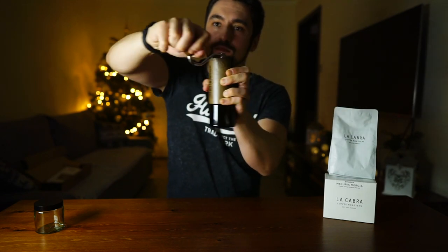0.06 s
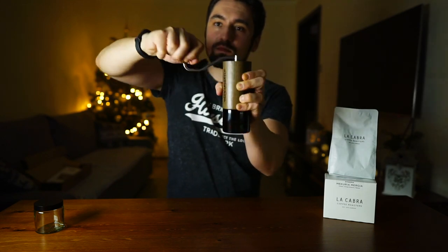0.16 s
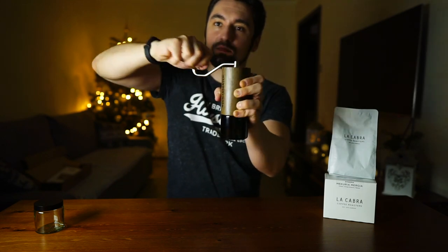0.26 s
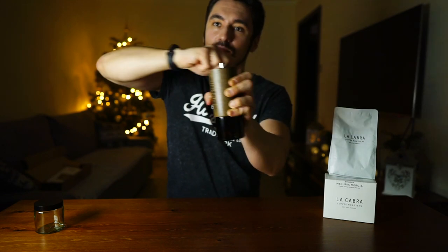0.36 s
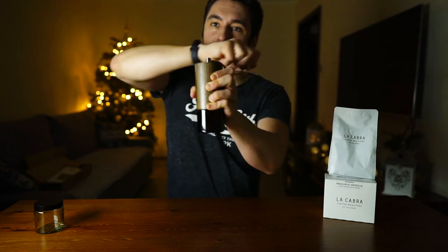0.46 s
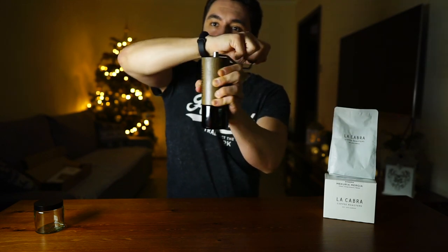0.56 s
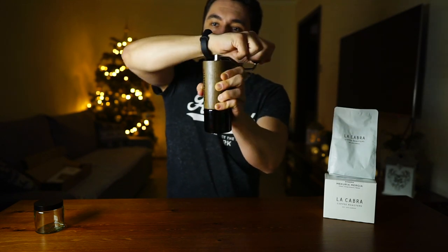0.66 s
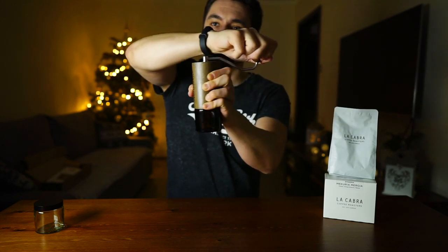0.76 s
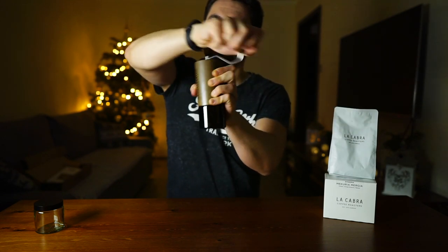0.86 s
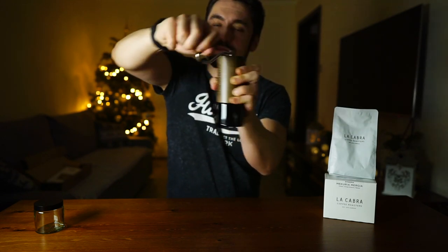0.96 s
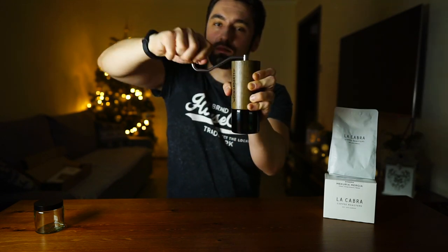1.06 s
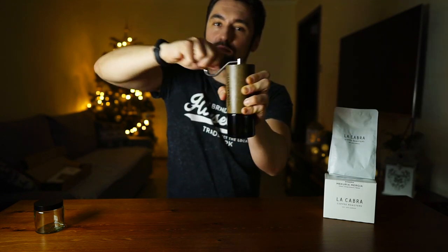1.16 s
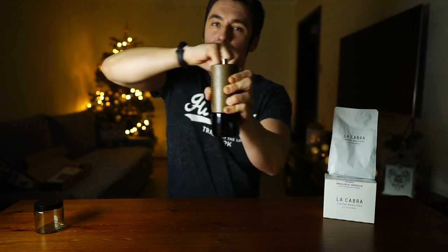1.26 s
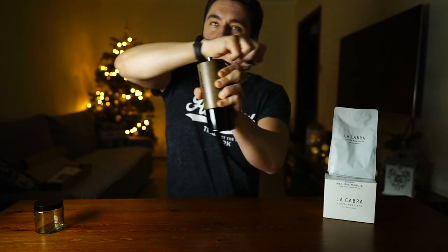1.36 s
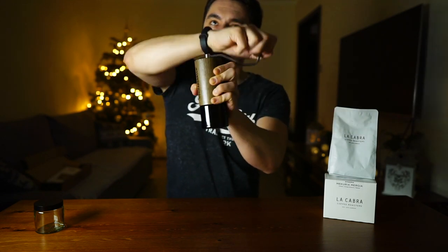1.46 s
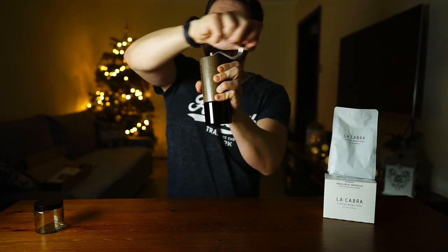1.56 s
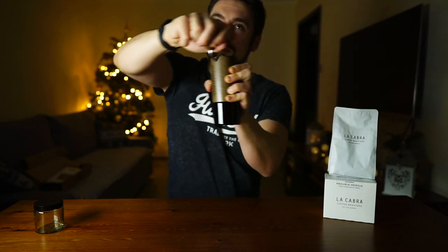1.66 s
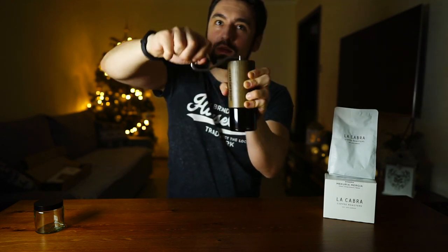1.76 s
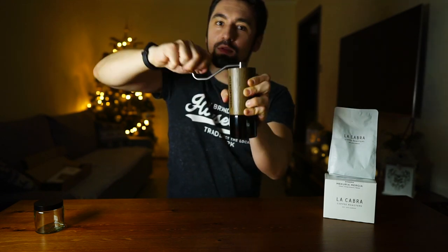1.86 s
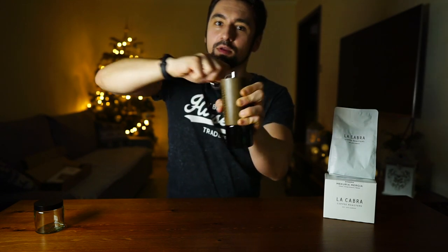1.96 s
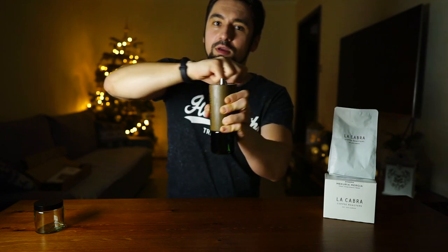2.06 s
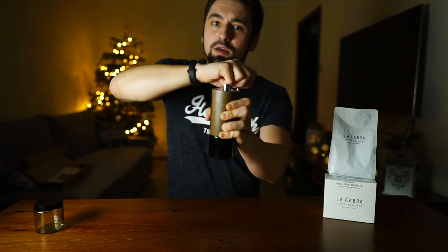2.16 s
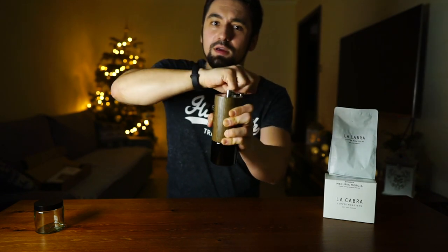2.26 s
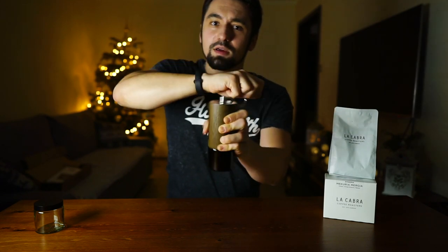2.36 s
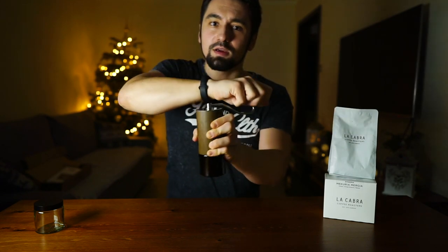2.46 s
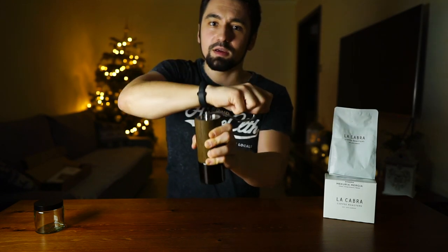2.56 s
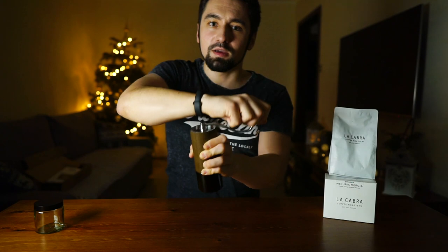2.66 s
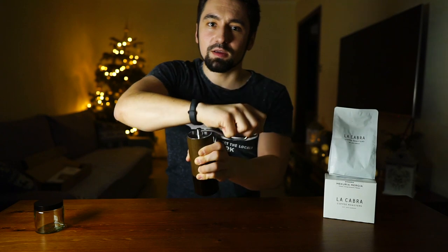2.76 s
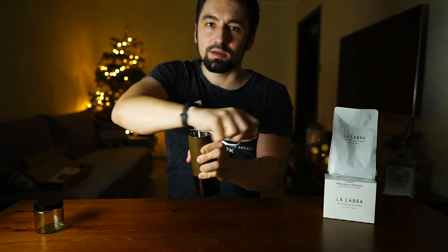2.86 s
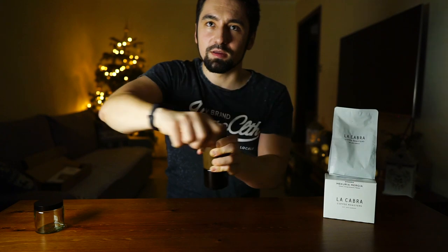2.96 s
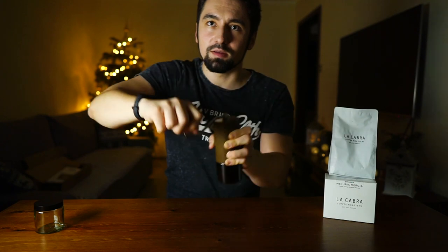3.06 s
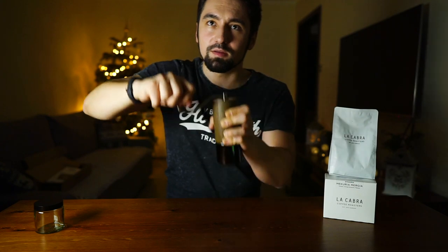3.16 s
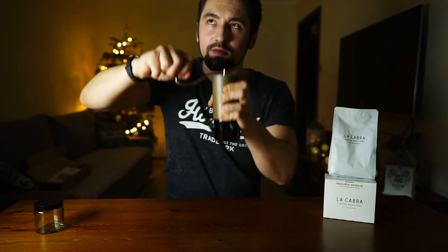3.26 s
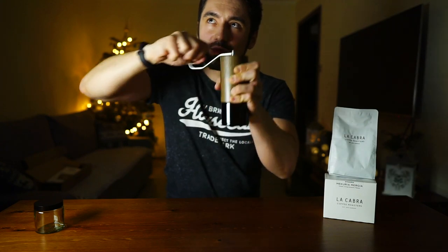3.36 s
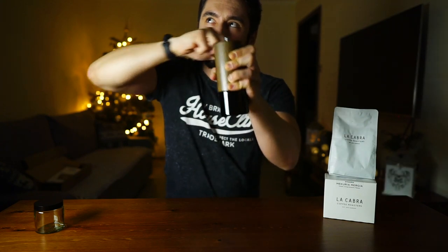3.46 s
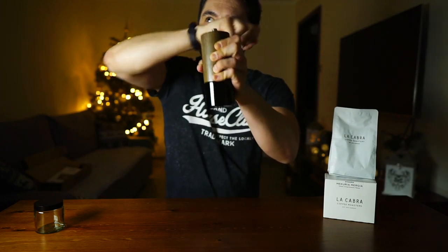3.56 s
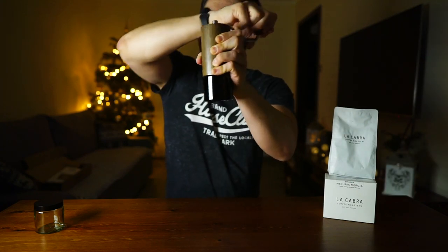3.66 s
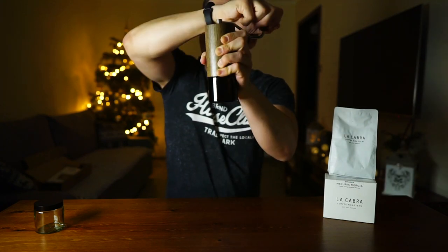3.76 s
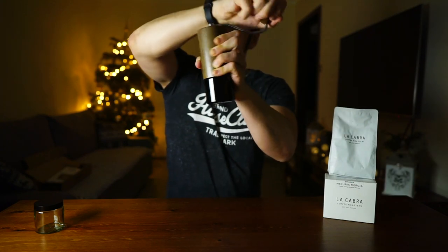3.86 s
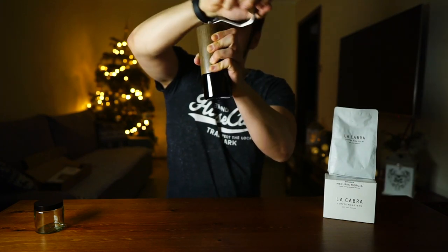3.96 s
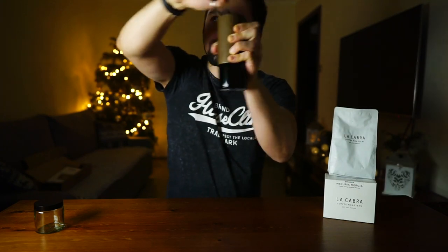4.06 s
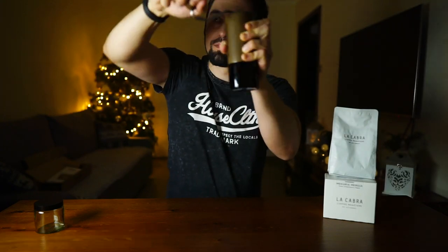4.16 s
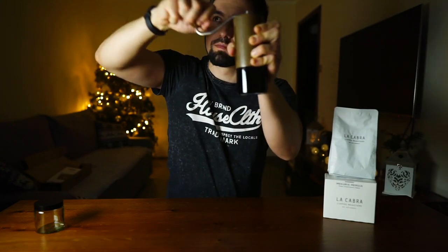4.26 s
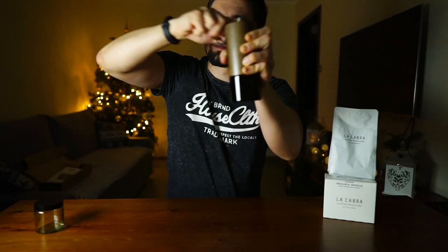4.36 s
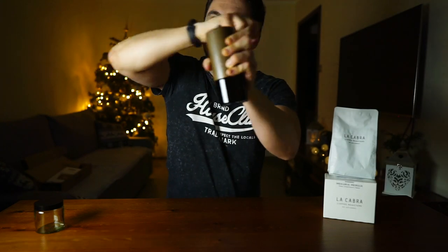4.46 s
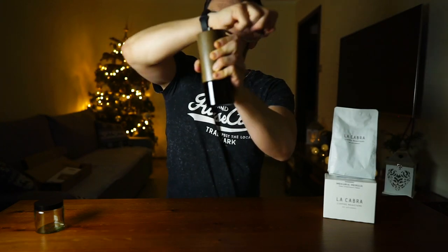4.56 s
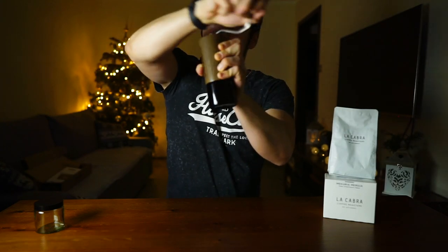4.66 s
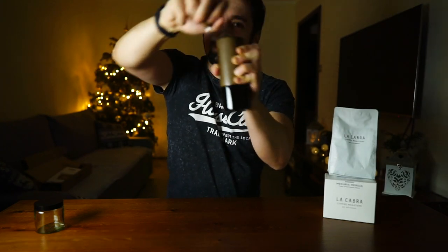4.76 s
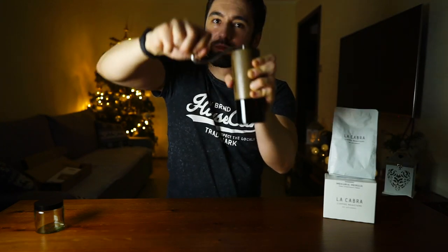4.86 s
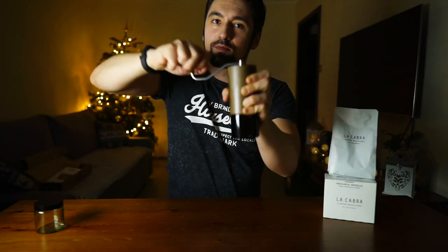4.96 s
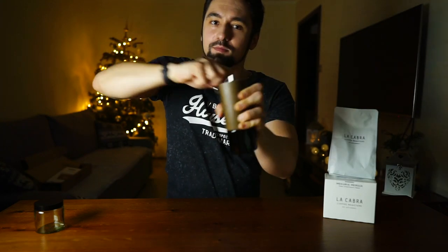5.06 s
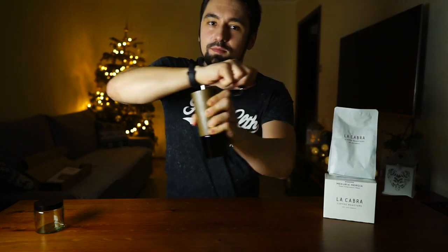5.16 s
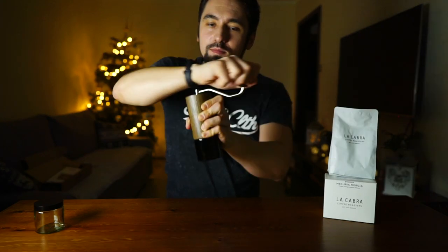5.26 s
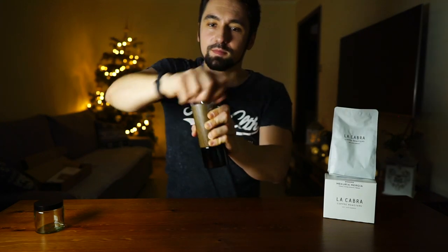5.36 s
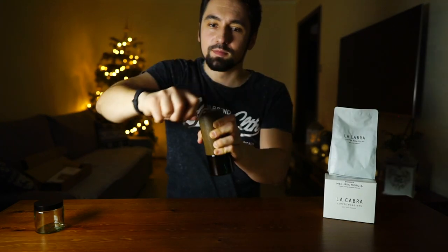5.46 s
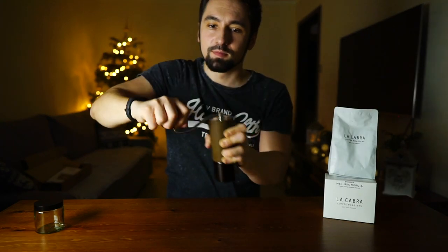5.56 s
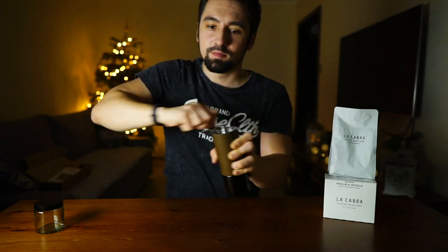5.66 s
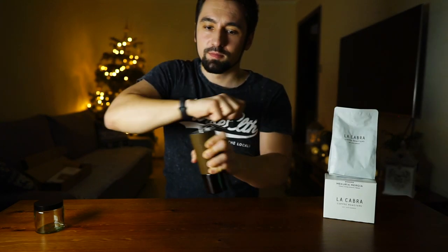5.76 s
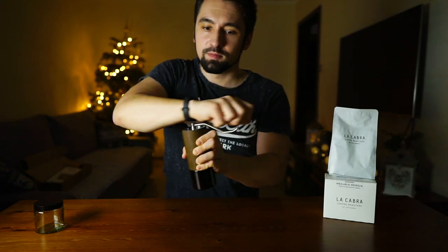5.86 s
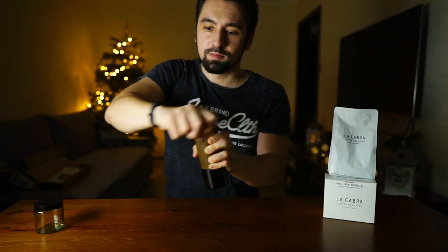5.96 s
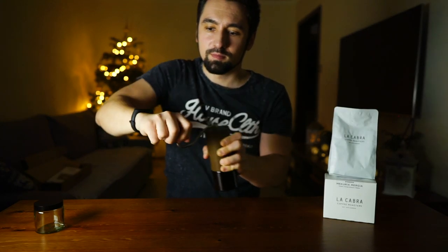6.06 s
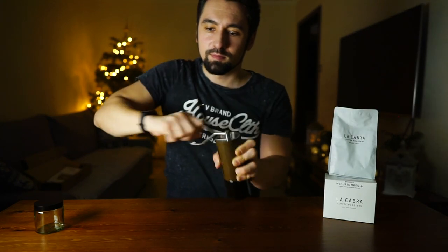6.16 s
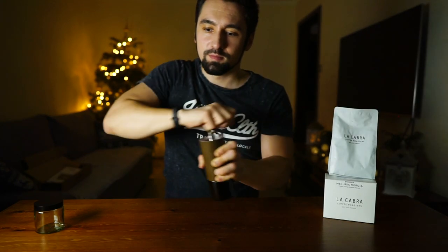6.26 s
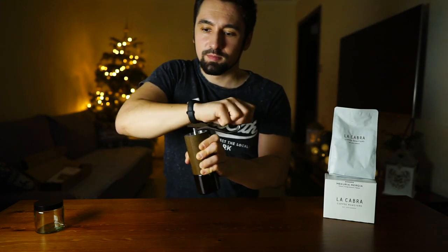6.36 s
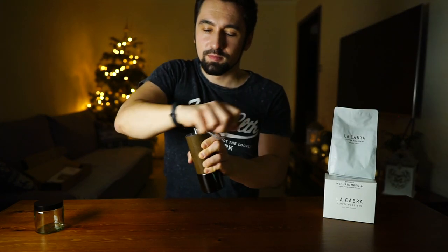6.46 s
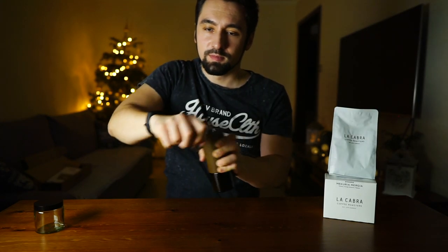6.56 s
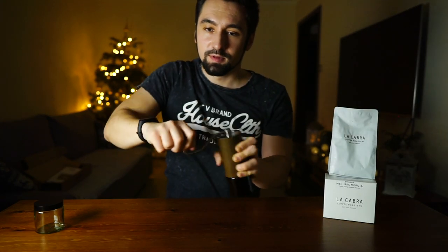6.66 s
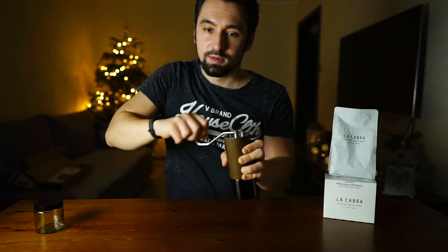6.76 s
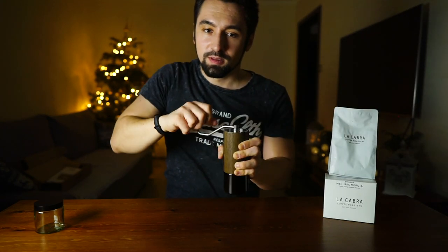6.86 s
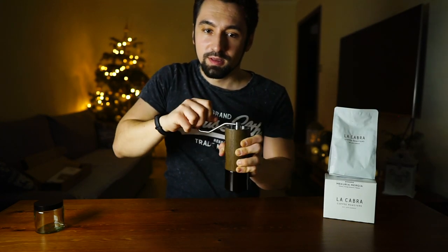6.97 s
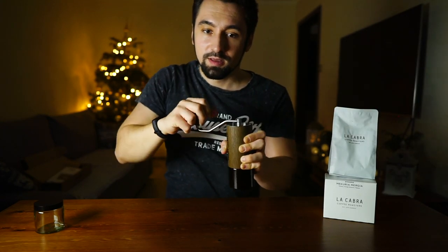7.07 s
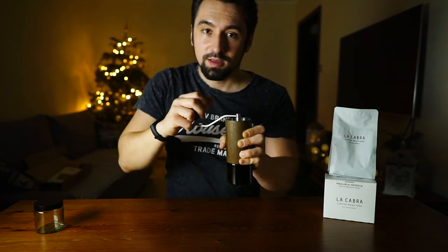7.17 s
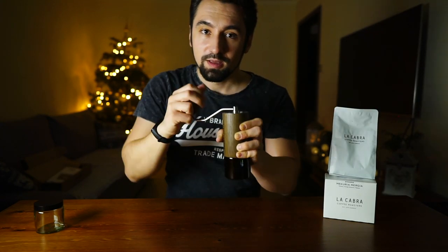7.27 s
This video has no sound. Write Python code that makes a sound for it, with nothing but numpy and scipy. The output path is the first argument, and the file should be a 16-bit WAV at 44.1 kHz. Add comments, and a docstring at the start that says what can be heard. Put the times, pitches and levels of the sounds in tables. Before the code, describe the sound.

A hand coffee grinder crunches through whole beans in uneven pushes, with sharp cracks and brief stalls, in a quiet room.

```python
"""Hand coffee grinder in a quiet room

Close to the microphone, the crank stalls on hard beans a few times, then runs freely and stops.
Beans fracture between the burrs in clusters of tiny snaps that ring the steel and the hollow barrel.
The moving arms stir a low rumble of air at the microphone, and the room adds a short tail."""
import sys
import numpy as np
from scipy import signal
from scipy.fft import rfft, irfft
from scipy.io import wavfile
from scipy.ndimage import uniform_filter1d

SR = 44100
rng = np.random.default_rng(int(sys.argv[2]) if len(sys.argv) > 2 else 0)


def output_pcm(signal):
    """Save a mono or channel-first signal as 16-bit PCM at the path in sys.argv[1].

    Samples are clipped to [-1, 1] before scaling.
    """
    pcm = np.clip(np.atleast_2d(signal).T, -1, 1) * 32767
    wavfile.write(sys.argv[1], SR, np.round(pcm).astype(np.int16))


N = 322812
TIME = np.arange(N) / SR

# Pushes on the crank, a catch or stall between them: start_s, end_s, crunch_db, sag_db, barrel_db
# (sag is the fall in level over the push; the barrel is relative to the crunch)
CRANK_PUSHES = [(-.03, 0.3, -23, 2.5, 2), (0.327, 0.551, -22.5, 7, 0.5), (0.729, 0.783, -20, -3, 2.5),
                (0.849, 1.061, -19.5, .5, 2), (1.071, 1.424, -23, -6, 3), (1.437, 1.497, -25, 4.5, -1),
                (1.507, 1.834, -21.5, 2, 1), (1.844, 2.077, -25, -3, 2.5), (2.107, 2.153, -25.5, 10, 0.5),
                (2.338, 2.393, -33.5, 0, -5.5), (2.429, 2.484, -22.5, -2, 2.5),
                (2.515, 2.552, -28, 0.5, -1.5), (2.636, 2.67, -29.5, 13, -2.5),
                (2.711, 2.772, -31, 16, -1.5), (2.887, 2.929, -22, -6.5, 2.5),
                (2.949, 3.163, -24.5, 7, 5.5), (3.342, 3.674, -18.5, -0.5, 0), (3.704, 3.749, -34, -1, -3),
                (3.887, 3.923, -14.5, 6, 2.5), (3.972, 4.006, -15.5, 3, -5.5),
                (4.03, 4.169, -16.5, 2.5, -.5), (4.181, 4.384, -21, 1, -1), (4.389, 4.592, -18.5, 0, 1.5),
                (4.636, 4.953, -20.5, 8, 2), (4.99, 5.067, -23, 6, -3.5), (5.07, 5.221, -20.5, 6, 1),
                (5.218, 5.526, -23.5, 1, 2), (5.549, 5.749, -21.5, -7, -0.5), (5.779, 5.907, -22, 1, 4),
                (5.923, 6.088, -23.5, 2.5, 6.5), (6.097, 6.319, -23, -2.5, 2.5),
                (6.331, 6.559, -24, 3.5, 4.5), (6.57, 6.833, -22.5, 2, 3.5)]
# Dull knocks as the burr slips past a bean: start_s, level_db
BURR_SLIPS = [(.29, -14), (.43, -1.5), (1.045, -8), (1.352, -1.5), (1.416, -1.5), (1.514, -5.5),
              (1.609, -3.5), (2.064, -5.5), (2.953, -3.5), (3.852, -9.5), (3.894, -6.5), (3.978, -0.5),
              (4.207, -5), (4.259, 0.5), (4.399, 1.5), (4.635, -5.5), (5.165, -0.5), (5.304, -5.5),
              (5.393, -6.5), (5.929, -7), (6.357, -7), (6.561, -4)]


def grinding(burrs, barrel, teeth, crunch_db, barrel_db, fine_db, teeth_db, teeth_steepness):
    """Coarse fractures and fine chips ring burrs and barrel; heavy loads make the teeth sing."""
    coarse = fractures(per_s=700, spread_db=3.5, crumble_s=0.00038, dust=0.69)
    coarse = uniform_filter1d(coarse, size=2)  # large pieces give way more softly
    fine = np.diff(fractures(per_s=420, spread_db=4.0, crumble_s=0.0003, dust=0.25), prepend=0)
    force = coarse + gain_of(fine_db) * fine
    crunch, hollow = np.zeros((2, N))
    for start, end, level_db, sag_db, hollow_db in CRANK_PUSHES:
        load = gain_of(level_db) * crank_push(start, end, sag_db)
        crunch += load * gain_of(crunch_db)
        hollow += load * gain_of(hollow_db + barrel_db)
    singing = gain_of(teeth_db) * (crunch / crunch.max()) ** teeth_steepness
    out = np.zeros(N)
    for envelope, body in (crunch, burrs), (hollow, barrel), (singing, teeth):
        out += envelope * steadied(signal.oaconvolve(force, body)[:N], span_s=0.096)
    return out * tooth_bites() * hesitation(depth_db=-1.5, hold_s=0.02)


def fractures(per_s, spread_db, crumble_s, dust):
    """Force on the burrs: fractures of very unequal size, each a cluster of snaps, over fine dust."""
    strength = gain_of(spread_db * np.minimum(rng.exponential(1, N), 4))
    breaks = strength * (rng.random(N) < per_s / SR)
    pole = np.exp(-1 / (crumble_s * SR))
    clusters = signal.lfilter([1], np.poly([pole, pole]), breaks ** 2)  # each swells and dies
    activity = abs(uniform_filter1d(clusters, size=40))
    snaps = rng.standard_normal(N) * (rng.random(N) < 0.4)
    return snaps * np.sqrt(activity / activity.mean() + dust ** 2)


def crank_push(start, end, sag_db, attack_s=0.0084, release_s=0.0065, coast_s=0.035, coast_share=0.21):
    """Gain of one push: the burrs grip, the load sags or builds, then a faint scrape coasts on."""
    progress = np.clip((TIME - start) / (end - start), 0, 1)
    attack = 1 - np.exp(-np.maximum(TIME - start, 0) / attack_s)
    after = np.maximum(TIME - end, 0)
    release = (1 - coast_share) * np.exp(-after / release_s) + coast_share * np.exp(-after / coast_s)
    return attack * release * gain_of(sag_db * (0.5 - progress))


def tooth_bites(per_s=9.3, depth_db=1.54, jitter=0.25):
    """The crunch swells each time a burr tooth takes hold, in a loose rhythm."""
    wander = unit_rms(uniform_filter1d(rng.standard_normal(N), size=4000))
    rate = per_s * (1 + jitter * wander)
    return gain_of(depth_db * np.sin(2 * np.pi * np.cumsum(rate) / SR))


def hesitation(depth_db, hold_s):
    """Just before each knock the burr catches on a bean and the grinding thins."""
    caught = np.zeros(N)
    for s, _ in BURR_SLIPS:
        caught[(TIME > s - hold_s) & (TIME < s)] = 1
    return gain_of(depth_db * uniform_filter1d(caught, size=130))


def cracks(burrs, barrel, teeth, crack_db, barrel_db, teeth_db, crumble_s):
    """Whole beans split, each with its own hardness and length; the barrel answers, the teeth ping."""
    # The loudest cracks of single beans: start_s, level_db
    bean_splits = [(0.0252, -1), (.1494, -4), (.335, -4), (0.396, 0), (0.6287, -13), (.7119, -1),
                   (0.7825, 3.5), (0.855, -0.5), (.954, 4), (1.045, -1.5), (1.1436, 0.5), (1.3507, -7),
                   (1.514, 1.5), (1.573, 1.5), (1.607, -0.5), (1.8094, 0.5), (1.9153, -7), (1.9659, -2),
                   (2.0622, -8), (2.6345, -2), (2.7171, -5), (2.9512, -19.5), (3.015, 1.5), (3.1876, -2.5),
                   (3.3207, -12.5), (3.336, -6), (3.3938, 4.5), (3.7371, -0.5), (3.8398, -3.5),
                   (3.8511, -3), (3.903, 3.5), (3.9611, -6.5), (3.9736, 4.5), (4.1684, 3), (4.3195, -1),
                   (4.441, 6), (4.6491, 4), (4.8615, 2), (5.0505, 1.5), (5.1173, 1.5), (5.4004, -13),
                   (6.105, 0)]
    out = np.zeros(N)
    for (s, db), (hard, tough) in zip(bean_splits, rng.random((len(bean_splits), 2))):
        crack = burst(burrs, crumble_s * (0.5 + tough), rise_s=0.0011, hardness=0.52 * hard)
        add(out, s, gain_of(db + crack_db) * crack)
        add(out, s, gain_of(db + barrel_db) * burst(barrel, crumble_s=0.0053, rise_s=0.0027))
        add(out, s, gain_of(db + teeth_db) * burst(teeth, crumble_s=0.0009, rise_s=0.0005))
    return out


def knocks(burrs, barrel, knock_db, grit_db):
    """The burr jerks free and knocks the barrel, with a little grit."""
    out = np.zeros(N)
    for s, db in BURR_SLIPS:
        add(out, s, gain_of(db + knock_db) * burst(barrel, crumble_s=0.0017, rise_s=0.0029))
        add(out, s, gain_of(db + grit_db) * burst(burrs, crumble_s=0.0037, rise_s=0.012))
    return out


def settling(burrs, per_s, level_db, spread_db, fade_db_per_s, span_s):
    """After each push, loose pieces of bean tick in the hopper, ever more faintly."""
    out = np.zeros(N)
    for _, end, *_ in CRANK_PUSHES:
        for when, softness in rng.random((round(per_s * span_s), 2)):
            delay_s = when * span_s
            tick = burst(burrs, crumble_s=0.00094, rise_s=0.00022, hardness=0.22)
            tick_db = level_db - spread_db * softness - fade_db_per_s * delay_s
            add(out, end + delay_s, gain_of(tick_db) * tick)
    return out


def burst(body, crumble_s, rise_s, hardness=0, size=1500):
    """One cluster of snaps swells, dies and rings a body; a harder piece snaps brighter. Peak 1."""
    t = np.arange(size) / SR
    force = rng.standard_normal(size) * (1 - np.exp(-t / rise_s)) * np.exp(-t / crumble_s)
    sound = signal.fftconvolve(signal.lfilter([1, -hardness], [1], force), body)
    return sound / abs(sound).max()


def ringing(modes, low_hz, size=4096):
    """Impulse response of a resonant body; a small object radiates little below low_hz."""
    hz = abs(np.fft.fftfreq(size, 1 / SR))
    power = sum((gain_of(db) / (1 + (2 * (hz - f) / width) ** 2)) ** 2 for f, width, db in modes)
    log_gain = np.log(np.sqrt(power) * hz ** 2 / (hz ** 2 + low_hz ** 2) + 1e-4)
    minimum_phase = np.exp(np.conj(signal.hilbert(log_gain)))
    response = np.fft.ifft(minimum_phase).real[:size // 2]
    return response / np.linalg.norm(response)


def shading(x, depth_db, span_s):
    """The balance of the barrel's resonances tips slowly, and regions of the treble flare and fade."""
    # Weight of the barrel's low resonances against its high ones: time_s, low_over_high_db
    barrel_balance = [(0, -7), (.7, -0.5), (1.5, -3.5), (2.2, 5), (2.7, 4.5), (3.5, 0), (4.2, 0), (5, 0.5),
                      (5.6, 11.5), (6.1, 5), (6.8, 0)]
    hz, frame_s, spectrum = signal.stft(x, SR, nperseg=512)
    drift = rng.standard_normal(spectrum.shape)
    for _ in range(2):
        drift = uniform_filter1d(drift, size=11, axis=0)
        drift = uniform_filter1d(drift, size=max(round(span_s / frame_s[1]), 1), axis=1)
    beaming = hz / (hz + 1500)  # short waves are shaded most
    flare_db = depth_db * beaming[:, None] * unit_rms(drift)
    seesaw = np.interp(hz, [620, 740, 850, 980, 1080, 1300], [0, 0.5, 0.5, -0.5, -0.5, 0])
    balance_db = np.outer(seesaw, np.interp(frame_s, *np.transpose(barrel_balance)))
    return signal.istft(spectrum * gain_of(flare_db + balance_db), SR)[1][:N]


def stirred_air(level_db, buffet_db, steepness):
    """Air rumbles at the microphone as the arms sweep; only the strongest sweeps buffet higher up."""
    # Sweeps of the arms: middle_s, level_db, half_length_s
    arm_sweeps = [(0.167, -35, 0.079), (0.336, -47, 0.12), (1.07, -37, .15), (1.81, -49, 0.22),
                  (3.45, -34.5, .07), (3.67, -44.5, 0.077), (4.202, -27, 0.2), (4.87, -36.5, 0.21)]
    # Spectrum of the low rumble: frequency_hz, density_db
    rumble_spectrum = [(10, 2.5), (25, 1), (45, -6), (80, -12), (125, -21), (170, -34), (250, -41.5),
                       (600, -64)]
    # Spectrum of air buffeting the microphone: frequency_hz, density_db
    buffet_spectrum = [(30, -27), (80, -2), (150, -10.5), (270, -3), (400, -7.5), (800, -35.5)]
    flow = sum(gain_of(db) * np.exp(-((TIME - s) / half_s) ** 2) for s, db, half_s in arm_sweeps)
    flow += gain_of(-60)  # nearly still air between sweeps
    rumble = gain_of(level_db) * flow * steadied(noise(rumble_spectrum), span_s=0.43)
    buffet = gain_of(buffet_db) * (flow / flow.max()) ** steepness * noise(buffet_spectrum)
    return rumble + buffet


def hand_thumps(swell_s):
    """The hands thump softly on the grinder, a few low cycles each time."""
    # Thumps of the hands: start_s, peak_db, pitch_hz
    thumps = [(3.645, -34, 99), (3.691, -44, 171), (4.162, -27.5, 145), (4.246, -30.5, 160)]
    out, t = np.zeros(N), np.arange(SR // 8) / SR
    envelope = t / swell_s * np.exp(1 - t / swell_s)
    for s, db, hz in thumps:
        add(out, s, gain_of(db) * envelope * np.sin(2 * np.pi * hz * t))
    return out


def room(x, size=16384):
    """The grinder sways from place to place, and each place has its own echoes."""
    hop = size // 2
    out, padded = x.copy(), np.pad(x, (hop, size))
    crossfade = np.sqrt(signal.windows.hann(size, sym=False))
    for start in range(0, N + hop, hop):
        response = reflections(early_db=-13.0, early_s=0.0081, tail_db=-11.5)
        echoes = signal.fftconvolve(padded[start:start + size] * crossfade, response)
        add(out, (start - hop) / SR, echoes[max(hop - start, 0):])
    return out


def reflections(early_db, early_s, tail_db, size=20000):
    """Quick echoes from hands, body and table, then a diffuse tail that lasts longest in the mids."""
    # Reverberation of the room: frequency_hz, t60_s
    decay_times = [(400, 0.21), (1000, 0.41), (2800, 0.54), (6000, 0.41), (9000, 0.23), (15000, 0.18)]
    t = np.arange(size) / SR
    early = rng.standard_normal(size) * (rng.random(size) < 2000 / SR)
    early *= (t > 0.0003) * np.exp(-t / early_s)
    hz, frame_s, spectrum = signal.stft(rng.standard_normal(size) * (t > 0.01), SR, nperseg=256)
    decay = gain_of(-60 * frame_s / curve_at(decay_times, hz)[:, None])
    tail = signal.istft(spectrum * decay, SR)[1][:size]
    early = gain_of(early_db) * early / np.linalg.norm(early)
    return early + gain_of(tail_db) * tail / np.linalg.norm(tail)


def room_tone(level_db):
    """The quiet room: a steady low rumble under faint hiss."""
    # Spectrum of the room tone: frequency_hz, density_db
    tone_spectrum = [(25, 10.5), (90, -15.5), (180, -9), (235, -5), (310, -14), (460, -14.5), (1000, -18.5),
                     (4000, -29.5), (15000, -26)]
    return gain_of(level_db) * noise(tone_spectrum)


def noise(spectrum):
    """Steady noise of a given colour, rms 1."""
    colour = gain_of(curve_at(spectrum, np.fft.rfftfreq(N, 1 / SR)))
    return unit_rms(irfft(rfft(rng.standard_normal(N)) * colour, N))


def steadied(x, span_s):
    """Evens out slow swings of level and keeps the fast grain."""
    window = np.hanning(int(span_s * SR))
    power = abs(signal.fftconvolve(x ** 2, window / window.sum(), 'same'))
    return x / np.sqrt(power + 1e-9)


def gain_of(db):
    """Decibels to amplitude."""
    return 10 ** (np.asarray(db) / 20)


def unit_rms(x):
    """Scales to rms 1."""
    return x / np.sqrt(np.mean(x ** 2) + 1e-20)


def curve_at(points, hz):
    """Reads a table on a log-frequency axis."""
    f, value = np.transpose(points)
    return np.interp(np.log(hz + 1), np.log(f + 1), value)


def add(mix, start_s, sound):
    """Mixes a sound in at a time."""
    part = mix[max(round(start_s * SR), 0):][:len(sound)]
    part += sound[:len(part)]


def scene():
    """One microphone near the grinder, with stirred air, hand thumps and room tone."""
    # Resonances of the steel burrs, shaft and wall: pitch_hz, width_hz, level_db
    burr_modes = [(1480, 800, -1.5), (2122, 825, 4), (2907, 660, -1.5), (3036, 200, 5), (3410, 1100, -9),
                  (4345, 760, -4), (5234, 890, -3.5), (5830, 740, -0.5), (6370, 810, -3.5), (8530, 2260, 0),
                  (9920, 1370, -3.5), (13000, 1400, -19), (14300, 2400, -17)]
    # Resonances of the hollow barrel: pitch_hz, width_hz, level_db
    barrel_modes = [(615, 67, -12.5), (764, 117, -3), (825, 144, 0), (966, 176, 0.5), (994.5, 66.4, 4)]
    # The highest ring of the burr teeth: pitch_hz, width_hz, level_db
    teeth_modes = [(13500, 2200, -5), (14020, 2000, 7.5)]
    burrs = ringing(burr_modes, low_hz=330)
    barrel = ringing(barrel_modes, low_hz=619)
    teeth = ringing(teeth_modes, low_hz=3000)
    grinder = grinding(burrs, barrel, teeth, crunch_db=-0.96, barrel_db=-0.1, fine_db=-2.5,
                       teeth_db=-29, teeth_steepness=2.7)
    grinder += cracks(burrs, barrel, teeth, crack_db=-6, barrel_db=-17.5, teeth_db=-32, crumble_s=0.0023)
    grinder += knocks(burrs, barrel, knock_db=-4.0, grit_db=-11.0)
    grinder += settling(burrs, per_s=28, level_db=-21, spread_db=7.5, fade_db_per_s=52, span_s=0.11)
    heard = room(shading(grinder, depth_db=1.42, span_s=0.082))
    handling = stirred_air(level_db=3.2, buffet_db=-39.0, steepness=1.42) + hand_thumps(swell_s=0.0092)
    return (heard + handling + room_tone(level_db=-61))[None]


def record(dry):
    """The highest peaks clip, then a steep low-pass cuts the top of the treble."""
    edge_hz = 15950
    low_pass = signal.firwin(511, edge_hz, window=("kaiser", 8), fs=SR)
    return signal.oaconvolve(np.clip(dry, -1, 1), low_pass[None], "same")


dry = scene()
out = record(dry)
output_pcm(out)
```